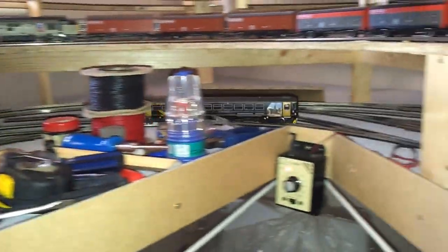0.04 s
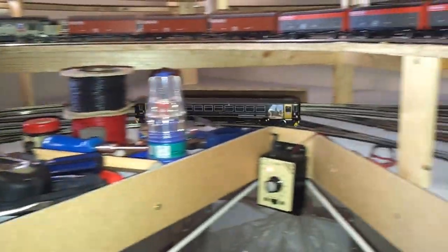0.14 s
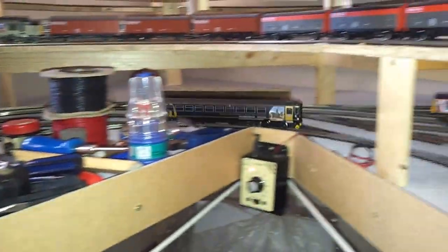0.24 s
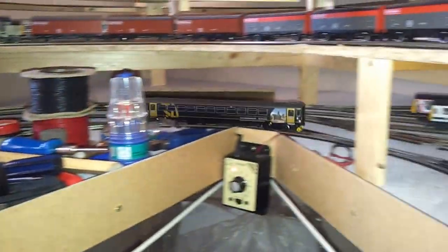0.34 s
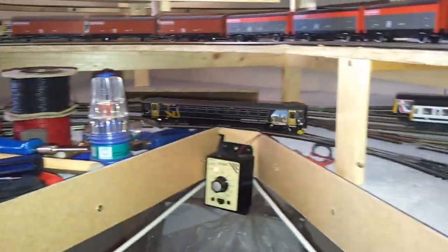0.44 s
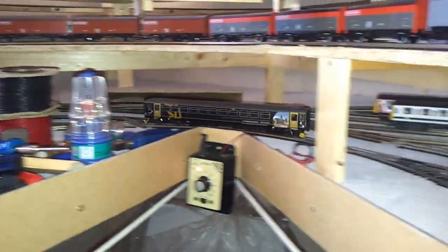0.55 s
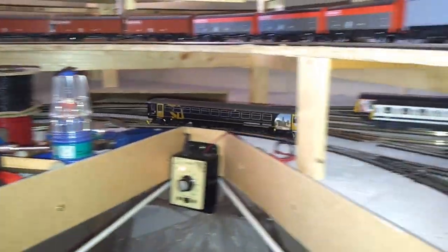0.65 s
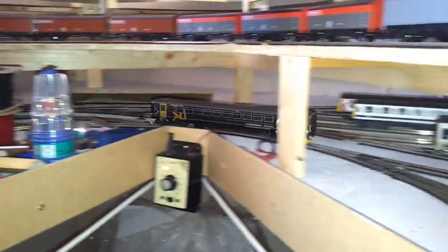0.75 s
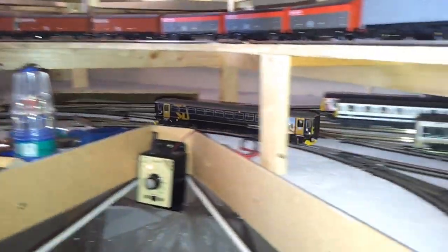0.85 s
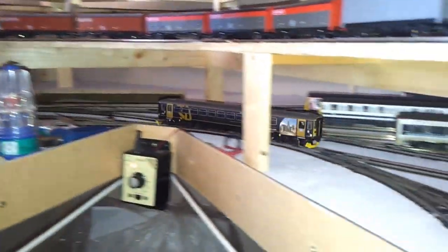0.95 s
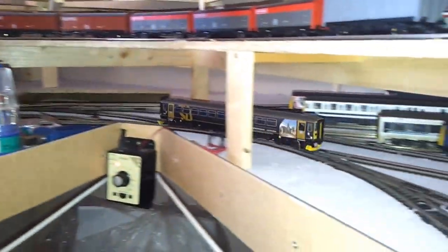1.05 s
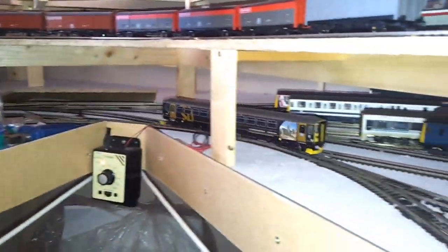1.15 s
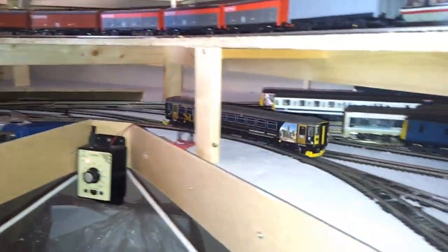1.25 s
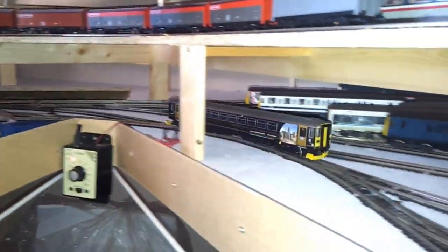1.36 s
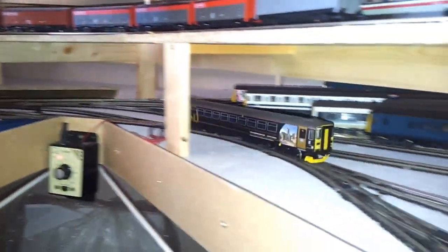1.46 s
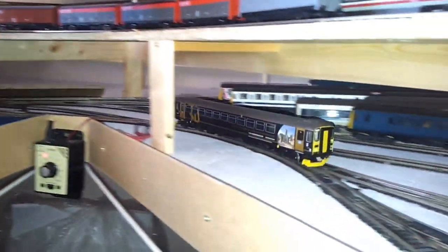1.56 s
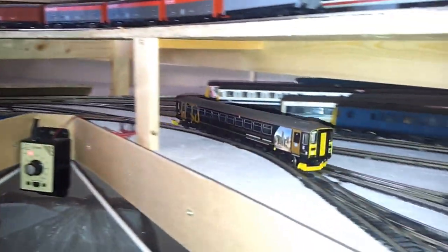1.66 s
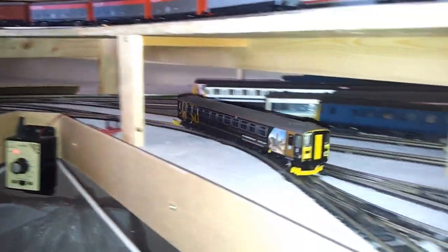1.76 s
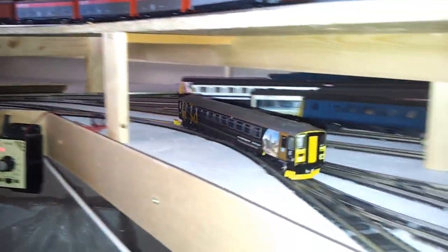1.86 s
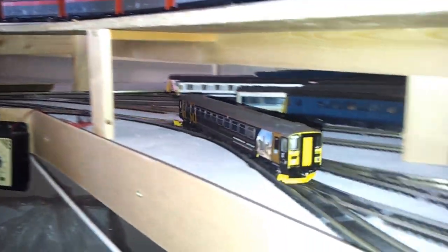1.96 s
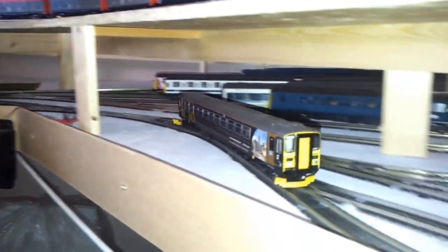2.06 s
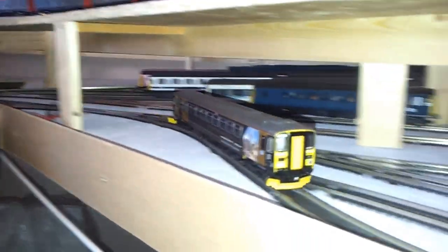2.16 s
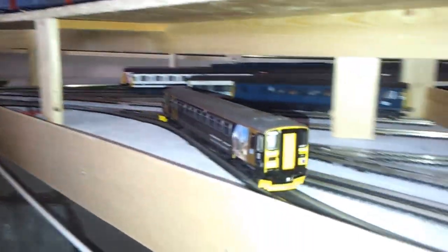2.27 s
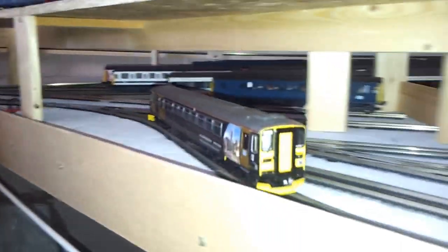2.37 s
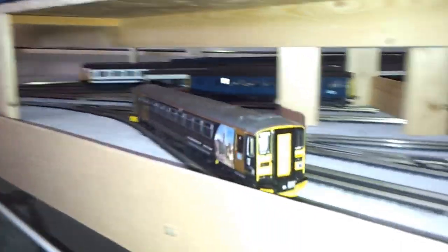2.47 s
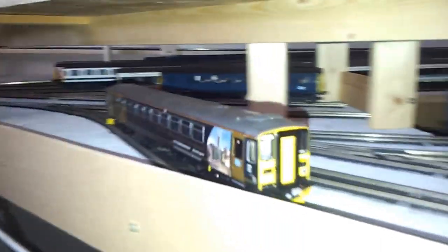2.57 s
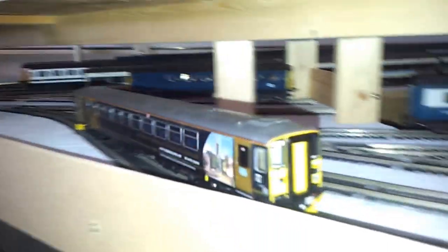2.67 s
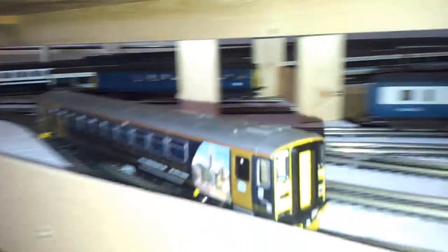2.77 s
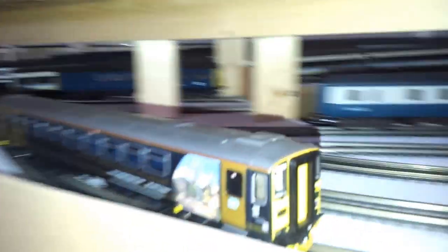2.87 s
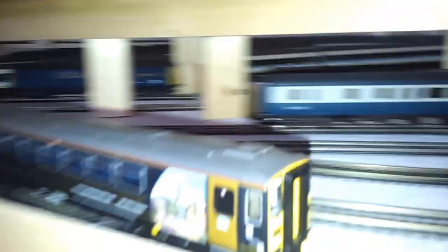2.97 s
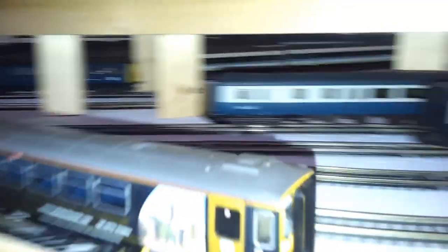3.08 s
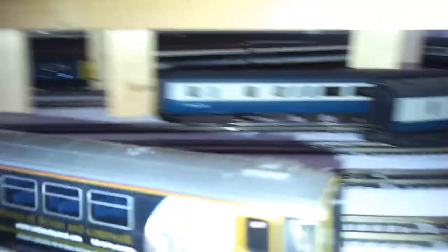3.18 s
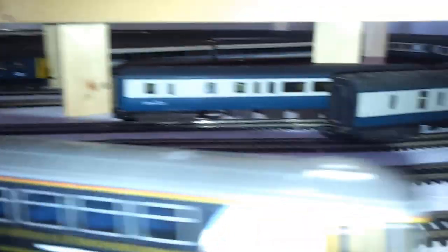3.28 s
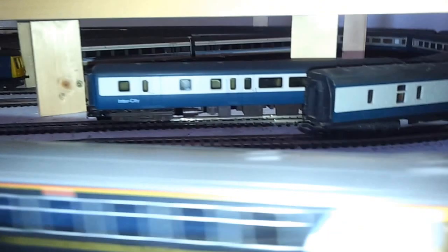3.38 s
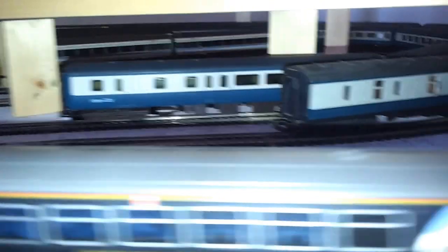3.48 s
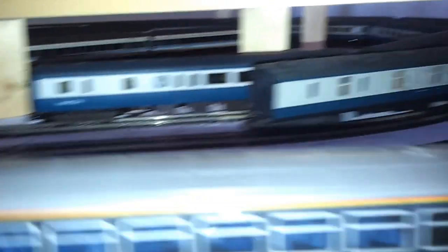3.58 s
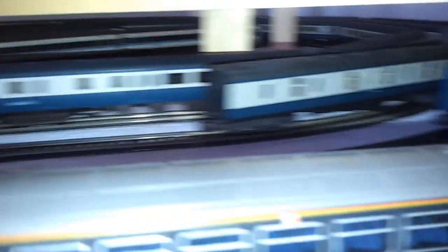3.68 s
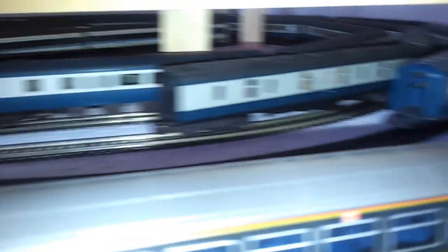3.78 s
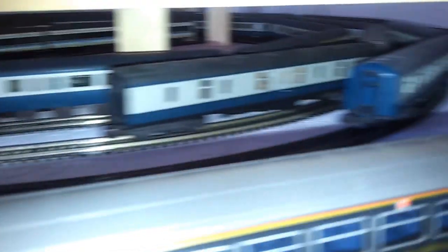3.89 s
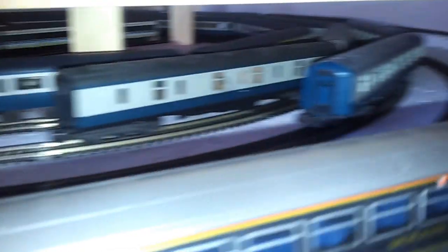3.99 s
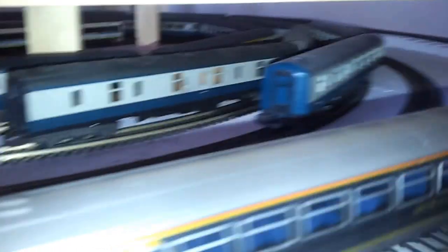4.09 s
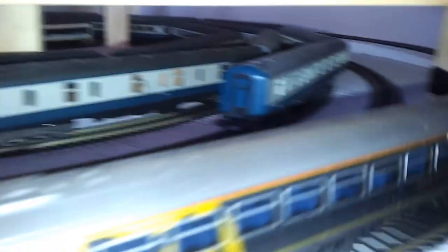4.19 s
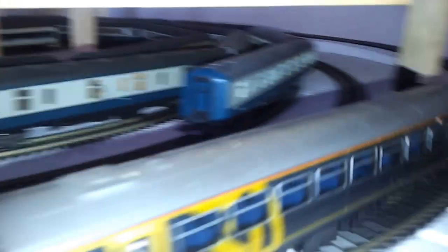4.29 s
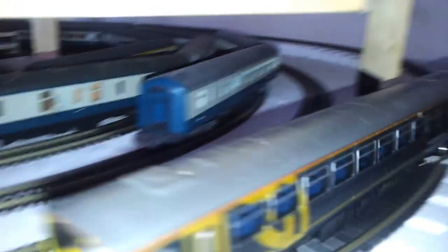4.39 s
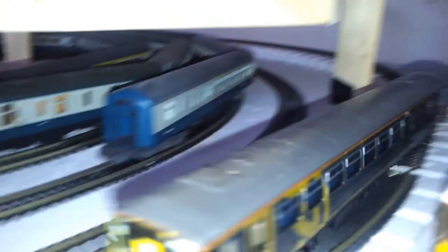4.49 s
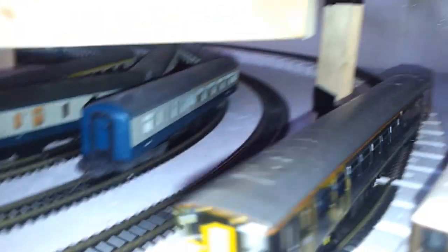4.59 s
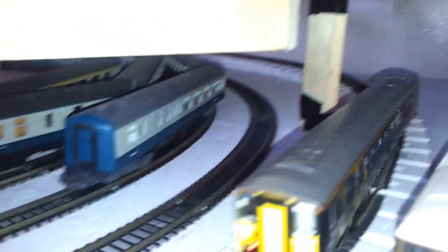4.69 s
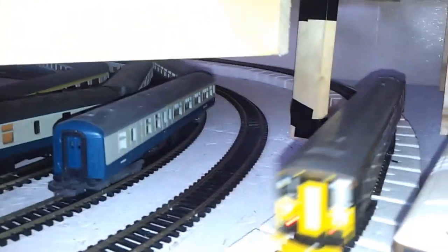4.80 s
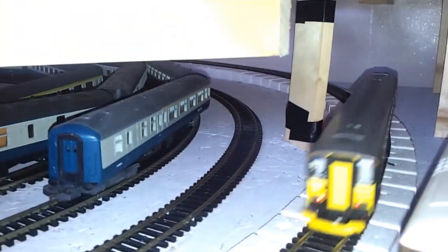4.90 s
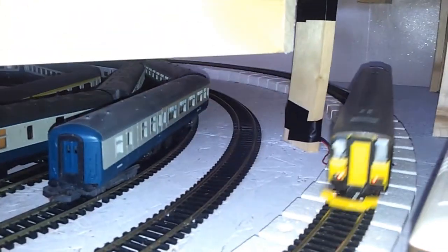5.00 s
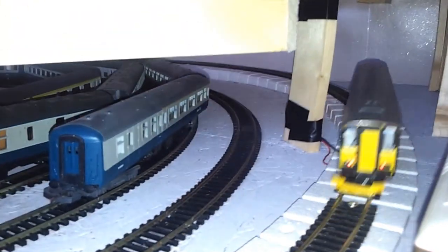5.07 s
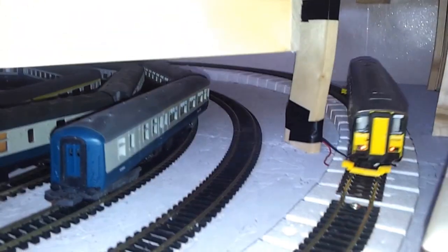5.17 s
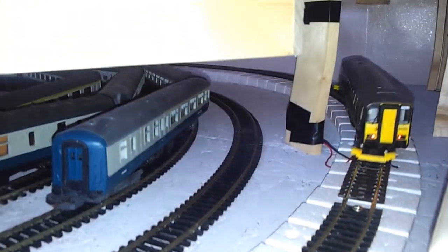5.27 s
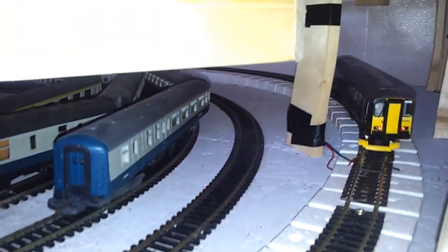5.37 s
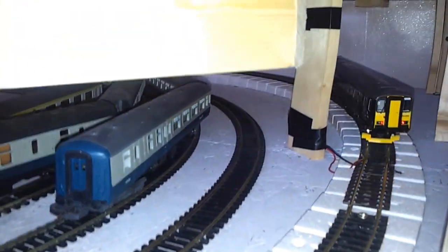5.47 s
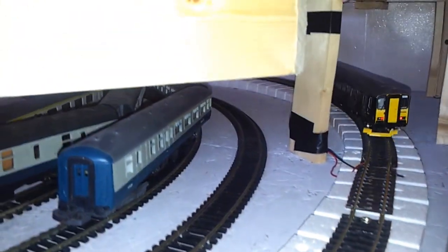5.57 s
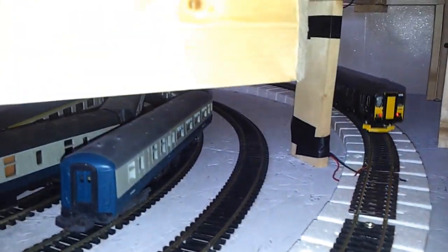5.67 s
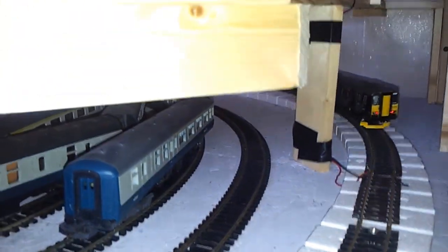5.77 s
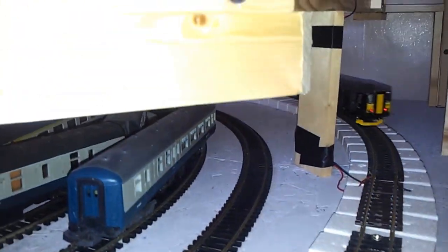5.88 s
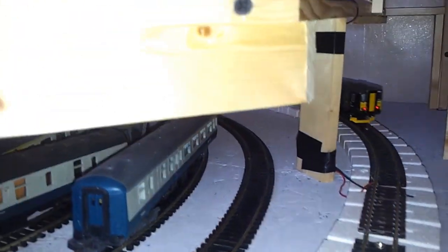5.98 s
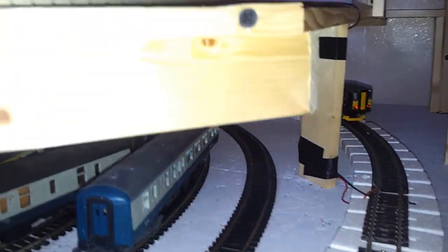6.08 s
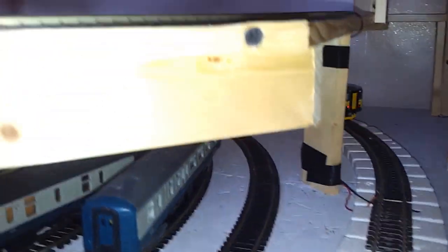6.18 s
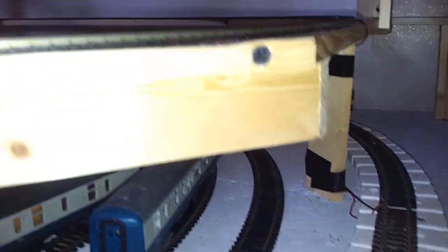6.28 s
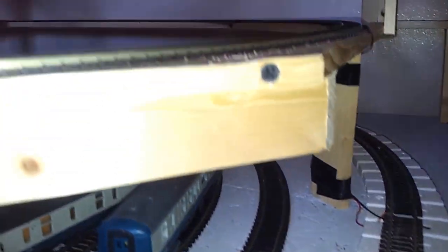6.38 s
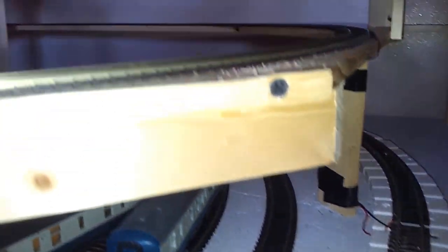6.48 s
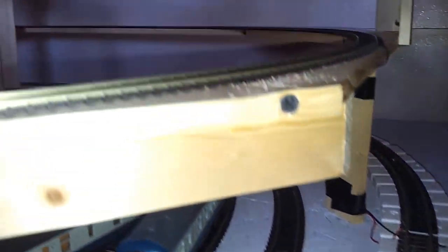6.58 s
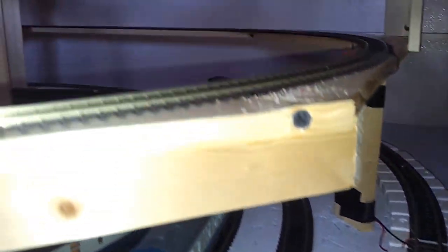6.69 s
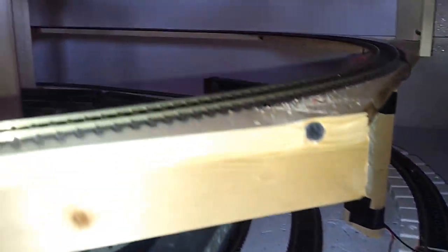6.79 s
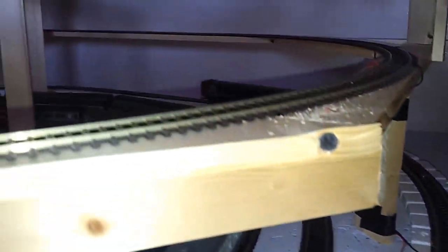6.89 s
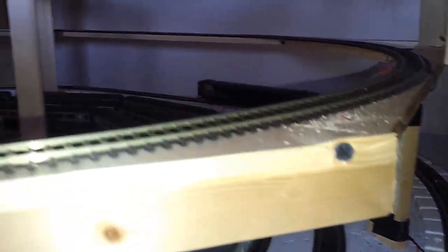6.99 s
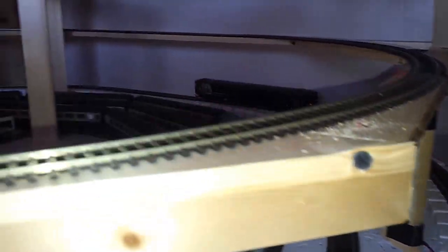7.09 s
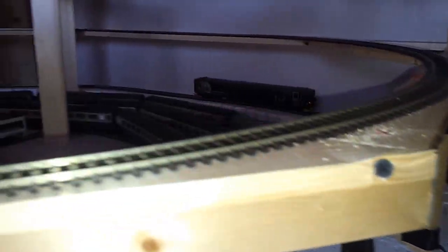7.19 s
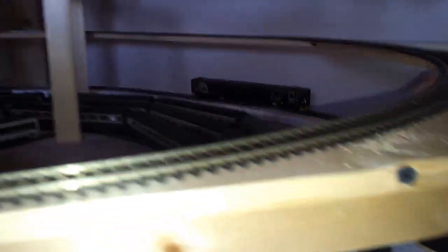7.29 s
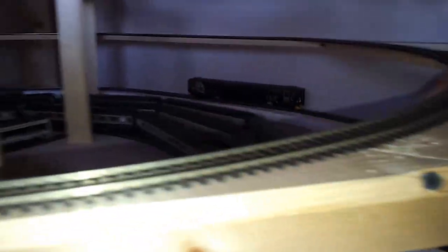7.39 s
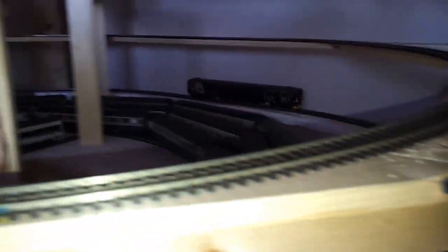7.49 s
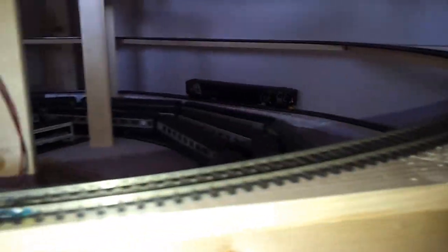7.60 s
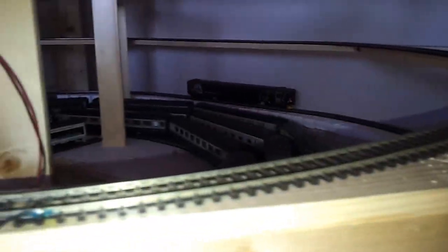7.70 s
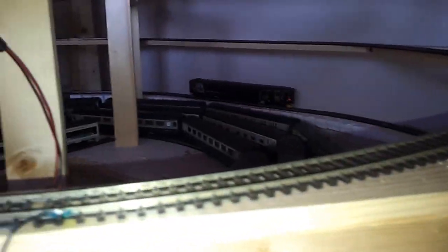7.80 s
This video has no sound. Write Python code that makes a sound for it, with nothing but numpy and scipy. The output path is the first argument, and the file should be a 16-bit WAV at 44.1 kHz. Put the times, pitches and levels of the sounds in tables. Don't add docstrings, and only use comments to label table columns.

```python
import sys
import numpy as np
from scipy import signal
from scipy.io import wavfile

SR = 44100
rng = np.random.default_rng(int(sys.argv[2]) if len(sys.argv) > 2 else 0)


def natural_amplitude(level_db):
    exponent = np.asarray(level_db, float) / 20
    return 10 ** exponent


def store_wav(level_fs):
    pcm = np.round(np.clip(np.atleast_2d(level_fs), -1, 1) * 32767)
    wavfile.write(sys.argv[1], SR, pcm.T.astype(np.int16))


N = 346185

# start_s, nearness_db, facing_db, left_minus_right_db
RUN = [(0, -40.5, 7.5, -2.5), (.35, -39, 5, -1), (.85, -37.5, 7.5, -1), (1.55, -37.5, 5.5, 1),
       (1.9, -34.5, 8, 0), (2.4, -37, 4.5, 0.5), (3.0, -37, 1.5, 1), (3.2, -32, 5, 0), (3.6, -32, 1, 1.5),
       (3.9, -29, 3.5, -2), (4.25, -33.5, 6.5, -3), (4.55, -32.5, 0.5, -5.5), (4.8, -33, 2.5, -5),
       (5.2, -33.5, -1, -4), (6.0, -34.5, -3.5, -4), (6.3, -32, -0.5, -1.5), (6.65, -33.5, -2.5, -2),
       (7.85, -35.5, 0.5, -1.5)]
# low_hz, high_hz
REGISTERS = [
    (150, 700),
    (700, 2500),
    (2500, 6000),
    (7000, 13000),
]
# start_s, peak_level_db, pitch_hz, chatter_t60_s, thud_db
POINTS = [(0.0843, -14.5, 1390, 0.4, -3.5), (0.1983, -15.5, 2370, 0.29, -1.5),
          (0.304, -15.5, 930, 0.46, -2.5), (0.339, -16.5, 1700, 0.27, -3), (0.467, -18.5, 1710, 0.23, 0),
          (.766, -15, 1810, .15, -10), (0.8333, -11.5, 1400, 0.37, -5), (.854, -2.5, 1480, 0.2, -5),
          (0.866, -11, 2620, .1, 2), (0.8793, -2, 1820, 0.076, -4), (0.89, -14, 3530, 0.088, 3),
          (0.942, -10, 2120, 0.23, -3), (1.042, -15, 1850, 0.082, -2), (1.062, -17, 1980, 0.085, 6),
          (1.128, -17, 1570, 0.078, 0), (1.171, -15, 1760, 0.087, -2), (1.217, -6, 1745, 0.19, -1),
          (1.3772, 0, 2500, 0.15, -4), (1.485, -17, 1470, .17, -8), (1.497, -2, 1720, 0.3, -6.5),
          (1.6, -13, 1590, 0.32, -4), (1.734, -21, 1100, 0.14, 10), (1.782, -10, 960, 0.24, 1),
          (1.8782, -4.5, 1620, 0.18, -0.5), (1.9777, -4, 1970, 0.22, -2.5), (1.9893, -0.5, 3210, 0.12, 0),
          (2.1246, -5.5, 2900, 0.34, -5), (2.222, -4.5, 1210, 0.32, -3.5), (2.273, -16, 1490, .1, 2),
          (2.373, -12, 1380, 0.054, 2), (2.485, -17.5, 1700, 0.088, 7.5), (2.599, -12.5, 2480, 0.056, 2.5),
          (2.8876, -9.5, 2530, 0.13, -10)]
# start_s, peak_level_db, pitch_hz, chatter_t60_s, thud_db
CROSSING = [(3.104, -9.5, 1980, 0.11, 0), (3.1222, -9, 1250, 0.14, -1), (3.2196, -7, 1280, 0.35, -0.5),
            (3.2819, -7, 2160, 0.13, -4), (3.3792, -7, 2040, 0.64, -5), (3.598, -8.5, 3870, 0.097, 0),
            (3.608, -15.5, 2300, 0.99, 3.5), (3.713, -9.5, 2370, 0.16, 5), (3.7274, 4, 2420, 0.033, -1),
            (3.7415, -13, 2310, 0.16, -1), (3.771, -13.5, 1400, 0.5, 1), (3.8067, -20, 1550, 0.05, 3),
            (3.8191, -1.5, 1870, 0.04, 5), (3.837, -12, 2640, 0.2, 6), (3.921, -13, 1605, 0.089, 0),
            (3.9415, -8, 1660, 0.046, -6), (3.968, -6.5, 1480, 0.055, -5), (4.025, -7.5, 2370, 0.059, -8),
            (4.06, -8, 2060, 0.18, -0.5), (4.213, -14, 2000, 0.12, 6), (4.219, -3.5, 2340, 0.51, -1.5),
            (4.232, -10, 2300, 0.12, 2), (4.3112, 0, 1514, 0.062, -1), (4.333, -8.5, 2820, 0.16, 4.5),
            (4.4328, -3.5, 4480, 0.18, 2.5), (4.51, -5, 4540, 0.054, -5), (4.603, -14, 2530, .1, -12),
            (4.608, -2.5, 4530, 0.05, -11), (4.6633, -25, 3900, 0.071, -5), (4.7805, -12, 1250, .04, -8),
            (4.8184, -4, 1570, 0.33, -2.5)]
# start_s, peak_level_db, pitch_hz, chatter_t60_s, thud_db
CURVE = [(4.916, -2.5, 4380, 0.05, 4), (5.107, -3, 2790, 0.078, 0), (5.2098, 0, 4200, 0.038, 0.5),
         (5.281, -16, 3900, .04, 0), (5.454, -8.5, 2070, 0.33, -2), (5.4979, -18, 4000, 0.055, -4),
         (5.534, -21, 3630, .05, 8), (5.554, -14.5, 5150, 0.075, 0), (5.649, -4, 3660, 0.28, -1),
         (5.749, -12.5, 4100, 0.13, 6), (5.959, -12.5, 4930, 0.1, 3), (6.057, -9, 2820, 0.078, 3),
         (6.068, -10, 3930, 0.34, -3), (6.182, -7, 4800, 0.3, -1), (6.266, -19, 3620, .05, 1),
         (6.2759, -4.5, 2840, .06, -1), (6.285, -12, 4260, 0.23, 0), (6.372, -16, 3300, 0.11, 2),
         (6.378, -5, 3510, 0.077, -1), (6.8177, -6, 2800, 0.64, -1), (6.9179, -7, 4000, 0.31, 0.5),
         (7.4588, -6.5, 3170, 0.99, -0.5), (7.5615, -7.5, 5020, 0.27, 1.5), (7.6914, -14.5, 4370, 0.18, -6)]
# body_db, hiss_db
STRETCHES = [
    (-6, -10.5),
    (-9, -8),
    (-12, -4),
]
# start_s, end_s, pitch_hz, lift_db
SINGING = [(1.15, 3.0, 9170, 5.5), (1.34, 2.3, 10050, 4), (1.9, 2.7, 9750, 3), (1.55, 2.5, 1510, 2),
           (1.745, 2.403, 990, 4.5), (2.95, 3.6, 3170, 1), (3.65, 4.17, 2290, 6), (4.2, 4.3, 2300, 5),
           (3.726, 4.007, 1560, 7.5), (3.89, 4.0, 1700, 7), (3.98, 4.13, 1800, 5), (3.805, 3.98, 1140, 6.5),
           (4.22, 4.447, 1530, 6.5), (4.21, 4.396, 1105, 6), (4.3, 4.52, 2900, 4), (4.48, 4.7, 2650, 4),
           (4.4, 4.72, 4680, 5), (4.42, 4.76, 3900, 4), (4.78, 5.02, 4500, 3), (4.678, 4.83, 1160, 9),
           (4.78, 4.9, 1020, 5), (4.85, 5.02, 920, 6), (4.547, 4.98, 1710, 5), (5.15, 5.5, 3900, 5),
           (5.4, 5.9, 3780, 4.5), (5.15, 5.6, 4500, 3), (5.95, 6.3, 3760, 2.5), (6.07, 6.25, 4620, 5),
           (6.25, 6.44, 3520, 7), (6.26, 6.34, 4200, 4), (6.738, 7.844, 4750, 3.5),
           (5.546, 5.84, 1160, 8.5), (7.0, 7.853, 1640, 3), (7.41, 7.5, 1010, 9), (.3, .42, 450, 5),
           (6.8, 7.0, 480, 5)]
# pitch_hz, right_minus_left_db
RIGHT_FAVOUR = [(1200, 2), (3500, 5.5), (9000, -5.5)]
# start_s, end_s, centre_hz, width_hz, lift_db
SHADING = [(-0.5, 4.4, 6300, 2600, -2.5), (2.25, 3.8, 5650, 2300, -2), (2.35, 3.6, 3700, 2300, -2),
           (6.4, 6.8, 2100, 1500, -1), (3.068, 3.87, 10200, 1230, 6.5), (3.08, 4, 12500, 2000, 8.5),
           (3.55, 4.2, 9600, 1100, 4), (6, 7.5, 5400, 1700, 5), (6, 9.9, 2500, 1400, -1.5),
           (3.5, 6.3, 14300, 1800, -6)]
# frequency_hz, level_db (per Hz)
LEFT_PORT = [(80, -14), (120, -18), (200, -9), (320, -0.5), (900, 0.5), (1600, 1), (2800, -1.5), (4200, -4),
             (5900, -11), (7500, -8), (9300, -2.5), (10300, -5), (12000, -1), (14300, -35.5)]
# frequency_hz, level_db (per Hz)
RIGHT_PORT = [(80, -14), (120, -18.5), (200, -14), (320, -7.5), (800, -3), (1500, -0.5), (2400, 0),
              (3300, -0.5), (4500, -0.5), (5200, -8), (6700, -22.5), (8500, -19), (11000, -39.5),
              (14300, -88.5)]
# frequency_hz, correlation (-1 to 1)
LIKENESS = [(60, 0.75), (130, -0.27), (290, -0.88), (640, -0.71), (1410, 0.05), (3100, -0.09),
            (6820, 0.078), (15000, 0.9)]


def rolling(grit_per_s, grit_db, grit_s):
    time_s = np.arange(N) / SR
    run_s = np.array(RUN)[:, 0]
    _, near_db, facing_db, pan_db = [np.interp(time_s, run_s, column) for column in np.transpose(RUN)]
    approach_db = near_db - near_db.mean()
    board_db = -42.5 + 0.55 * approach_db + 0.1 * facing_db
    body_db = near_db + facing_db
    rail_db = -33.5 + approach_db + 0.014 * facing_db
    levels_db = np.array([board_db, body_db, rail_db, near_db])
    speck_db = grit_db * np.minimum(rng.exponential(1, N), 3)
    specks = (rng.random(N) < grit_per_s / SR) * natural_amplitude(speck_db)
    grit = 1 + signal.lfilter([1], [1, -np.exp(-1 / (grit_s * SR))], specks)
    return natural_amplitude(levels_db)[:, None] * sides(pan_db) * grit


def knocks():
    rows = []
    for stretch, (body_db, hiss_db) in zip((POINTS, CROSSING, CURVE), STRETCHES):
        for start_s, peak_db, pitch_hz, t60_s, thud_db in stretch:
            pitch_tilt_db = -1.5 * np.log2(pitch_hz / 2000)
            chatter_tilt_db = 2 * np.log2(t60_s / 0.11)
            knock_body_db = body_db + thud_db + pitch_tilt_db + chatter_tilt_db
            knock_hiss_db = hiss_db - 1.5 * np.log2(t60_s / 0.16)
            rows.append((start_s, peak_db, knock_body_db, knock_hiss_db, pitch_hz, t60_s))
    return rows


def joints(bounce_db):
    crack_t60_s, rise_s, right_lag_s = 0.016, 0.00089, 0.00091
    chatter_db, knock_db, thud_db, rail_db = -5, -8, -8, -7.5
    out = np.zeros((4, 2, N))
    time_s = np.arange(SR // 2) / SR
    bounces = natural_amplitude(bounce_db * drift(98))
    for start_s, peak_db, body_db, hiss_db, _, t60_s in knocks():
        at = round(start_s * SR)
        pan_db = np.interp(start_s, *np.transpose(RUN)[[0, -1]])
        span_s = time_s[:N - at]
        stop = at + len(span_s)
        crack = natural_amplitude(-60 * span_s / crack_t60_s)
        chatter = natural_amplitude(chatter_db - 60 * span_s / np.clip(t60_s, 0.02, 0.6)) * bounces[at:stop]
        shape = (crack + chatter) * (1 - np.exp(-span_s / rise_s))
        register_db = np.array([body_db + thud_db, body_db, rail_db, hiss_db])
        colour = natural_amplitude(peak_db + knock_db + register_db)
        out[:, :, at:stop] += colour[:, None, None] * sides(pan_db)[:, None] * shape
    out[:, 1] = np.roll(out[:, 1], round(right_lag_s * SR), axis=1)
    return out


def rings(scatter_db):
    ring_db, partner_db, ring_t60_s, rise_s = -13.5, -12.5, 0.045, 0.00032
    ratios = np.array([1, 0.71, 0.73, 0.68])[:, None]
    out = np.zeros((2, N))
    time_s = np.arange(SR // 8) / SR
    rows = knocks()
    chance = rng.standard_normal((len(rows), 2, 2, len(ratios)))
    for (start_s, peak_db, _, _, pitch_hz, _), (strength, phase) in zip(rows, chance):
        at = round(start_s * SR)
        span_s = time_s[:N - at]
        mix = natural_amplitude(peak_db + ring_db + scatter_db * strength + partner_db * (ratios.T != 1))
        cycles = pitch_hz * ratios * span_s + phase[..., None]
        modes = np.sin(2 * np.pi * cycles) * natural_amplitude(-60 * span_s / ring_t60_s)
        rise = 1 - np.exp(-span_s / rise_s)
        out[:, at:at + len(span_s)] += (mix[..., None] * modes).sum(1) * rise
    return out


def through_ports(levels, patchy_db):
    power = []
    for low_hz, high_hz in REGISTERS:
        hz = np.linspace(low_hz, high_hz, 50)
        both_ports = natural_amplitude(2 * at_hz(LEFT_PORT, hz)) + natural_amplitude(2 * at_hz(RIGHT_PORT, hz))
        power.append(np.mean(both_ports) * (high_hz - low_hz) / 4)
    levels = levels / np.sqrt(np.array(power) * 2 / SR)[:, None, None]
    centres = np.log([np.sqrt(low_hz * high_hz) for low_hz, high_hz in REGISTERS])
    edges_hz = 76 * 2 ** np.arange(0, 7.8, 0.25)
    white = rng.standard_normal((2, 2, N))
    patches = natural_amplitude(patchy_db * drift(9.2))
    out = 0
    for k, (low_hz, high_hz) in enumerate(zip(edges_hz, edges_hz[1:])):
        hz = np.sqrt(low_hz * high_hz)
        place = np.interp(np.log(hz), centres, np.arange(4))
        below = min(int(place), 2)
        level = (below + 1 - place) * levels[below] + (place - below) * levels[below + 1]
        alike = np.clip(at_hz(LIKENESS, hz), -1, 1)
        mid, side = white[k % 2] * np.sqrt([[(1 + alike) / 2], [(1 - alike) / 2]])
        noise = np.array([mid + side, mid - side])
        port = natural_amplitude(np.array([[at_hz(LEFT_PORT, hz)], [at_hz(RIGHT_PORT, hz)]]))
        patch = np.roll(patches, k * SR // 5)
        band = signal.butter(2, [low_hz, high_hz], "band", fs=SR, output="sos")
        out = out + port * patch * signal.sosfilt(band, level * noise)
    return out


def singing(x, waver_db):
    out = x.copy()
    waver = natural_amplitude(waver_db * drift(7))
    rows = []
    for start_s, end_s, hz, lift_db in SINGING:
        width_hz = 170 * (hz / 1000) ** 0.3
        rows.append((start_s, end_s, hz, width_hz, lift_db, at_hz(RIGHT_FAVOUR, hz)))
    rows += [row + (0,) for row in SHADING]
    for k, (start_s, end_s, hz, width_hz, lift_db, lean_db) in enumerate(rows):
        start, end = round(start_s * SR), round(end_s * SR)
        span = slice(start, min(end, N))
        band = resonance(x[:, span], hz, 1.5 * width_hz)
        band = resonance(band, hz, 1.5 * width_hz)
        arch = np.sin(np.linspace(0, np.pi, end - span.start)[:band.shape[1]])
        swell = np.sqrt(np.abs(arch)) * np.roll(waver, k * SR // 3)[span]
        lift = natural_amplitude(np.array([[lift_db - lean_db / 2], [lift_db + lean_db / 2]])) - 1
        out[:, span] += lift * swell * band
    return out


def echoes(x, count):
    first_s, last_s, wander_s, echo_db = 0.003, 0.012, 0.002, -20
    out, n = x.copy(), np.arange(N)
    for side in (0, 1):
        for share in rng.random(count):
            lag_s = first_s + (last_s - first_s) * share + wander_s * drift(0.3)
            source = np.clip(n - np.round(lag_s * SR).astype(int), 0, n)
            out[side] += natural_amplitude(echo_db) * rng.choice([-1, 1]) * x[side, source]
    return out / np.sqrt(1 + count * natural_amplitude(2 * echo_db))


def resonance(x, hz, width_hz):
    r = np.exp(-np.pi * width_hz / SR)
    poles = [1, -2 * r * np.cos(2 * np.pi * hz / SR), r * r]
    return signal.lfilter([1, 0, -1], poles, x) * (1 - r * r) / 2


def sides(pan_db):
    return natural_amplitude(np.array([pan_db / 2, -pan_db / 2]))


def at_hz(points, hz):
    points_hz, values = np.transpose(points)
    return np.interp(np.log(hz), np.log(points_hz), values)


def rms_one(x):
    return x / np.sqrt(np.mean(x ** 2) + 1e-20)


def drift(rate_hz):
    r = np.exp(-16 * np.pi * rate_hz / SR)
    noise = rng.standard_normal(N // 8 + 4002)
    slow = signal.lfilter([1], [1, -2 * r, r * r], noise)[4000:]
    return np.interp(np.arange(N) / 8, np.arange(len(slow)), rms_one(slow))


def scene():
    contact = np.hypot(rolling(grit_per_s=65, grit_db=-27.0, grit_s=0.0025), joints(bounce_db=2.0))
    heard = singing(through_ports(contact, patchy_db=1.6), waver_db=1.7)
    heard = heard + rings(scatter_db=4.5)
    return echoes(heard, count=4)


def top_cut(x):
    return signal.sosfilt(signal.butter(12, 14750, fs=SR, output="sos"), x)


def record(dry):
    bass_cut = signal.butter(4, 137, "high", fs=SR, output="sos")
    mix = signal.sosfilt(bass_cut, natural_amplitude(-2) * dry)
    mix[0] += (natural_amplitude(5.63) - 1) * resonance(mix[0], hz=9600, width_hz=1330)
    mix = np.clip(mix, -1, 1)
    return top_cut(mix)


dry = scene()
out = record(dry)
store_wav(out)
```